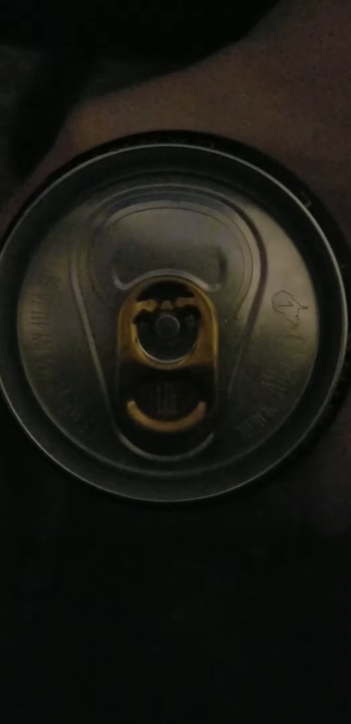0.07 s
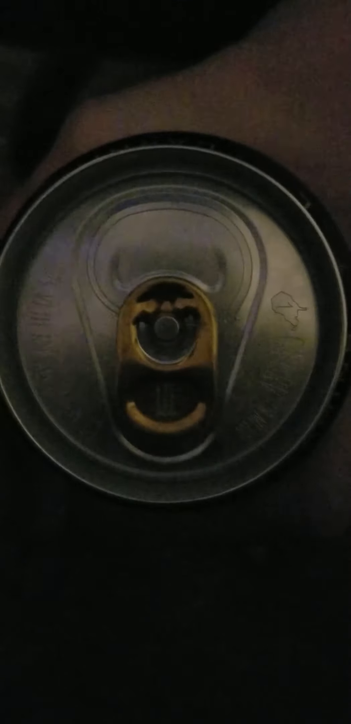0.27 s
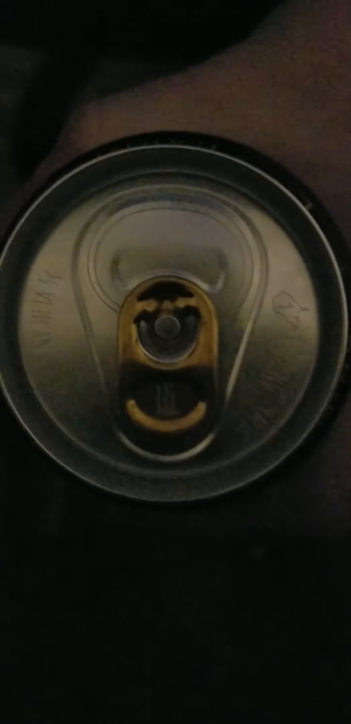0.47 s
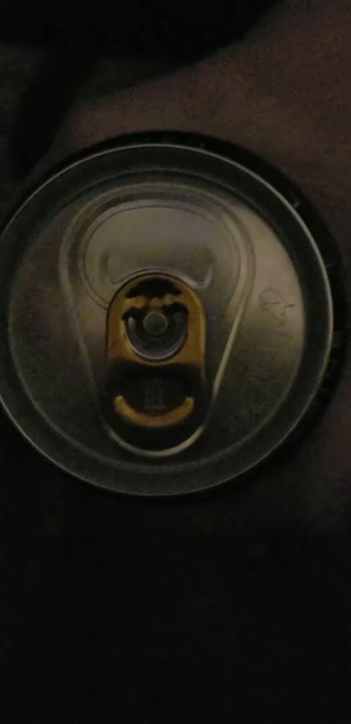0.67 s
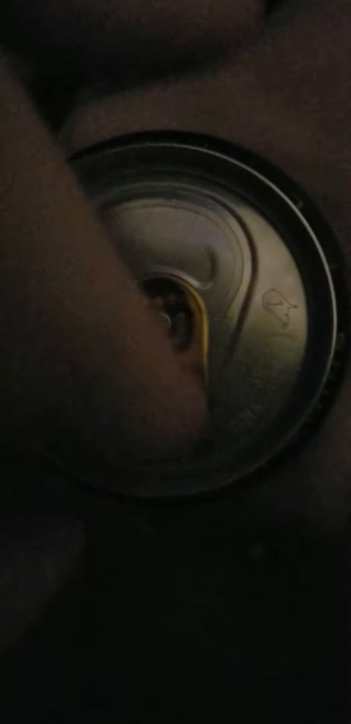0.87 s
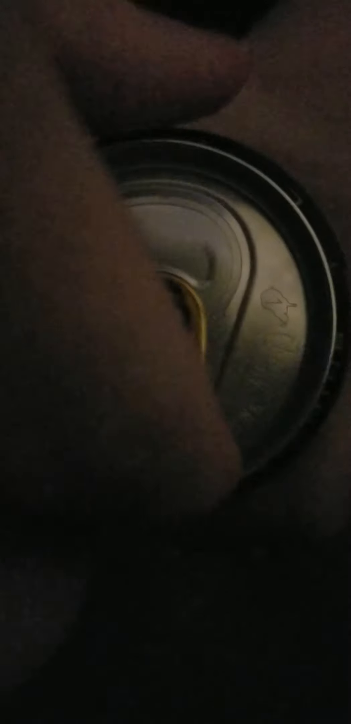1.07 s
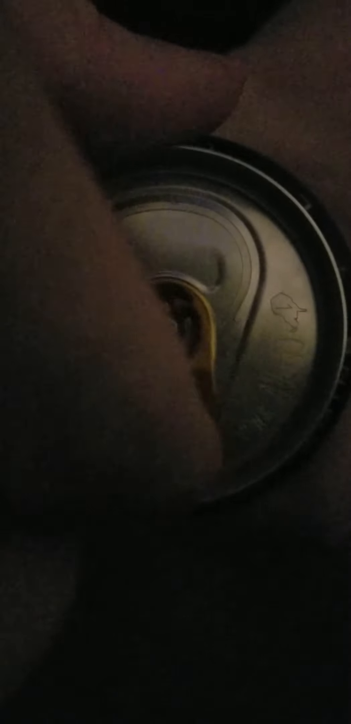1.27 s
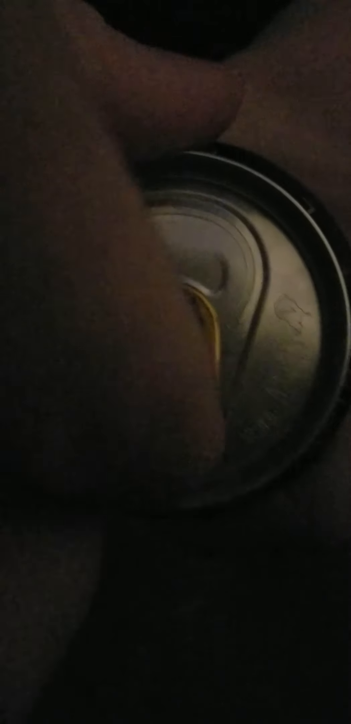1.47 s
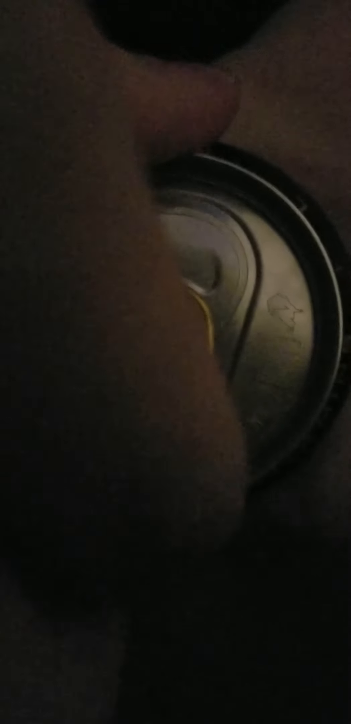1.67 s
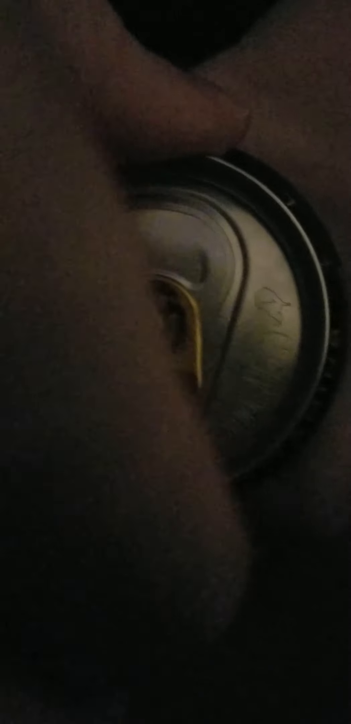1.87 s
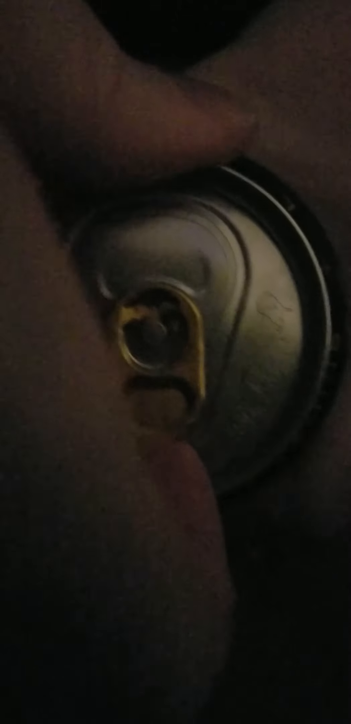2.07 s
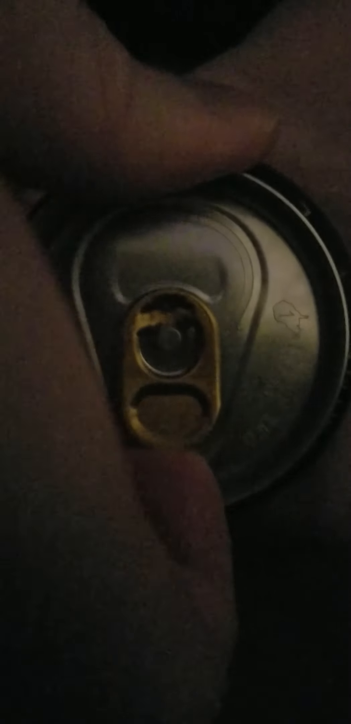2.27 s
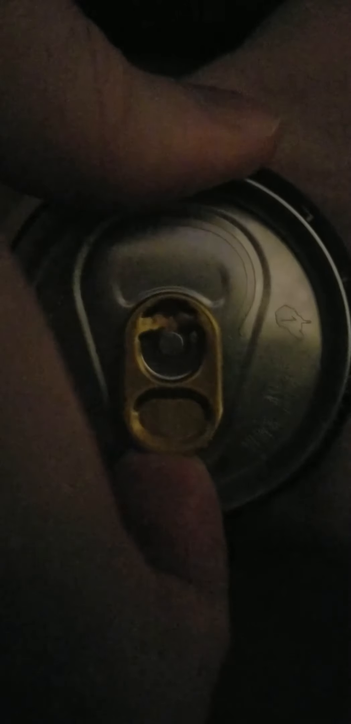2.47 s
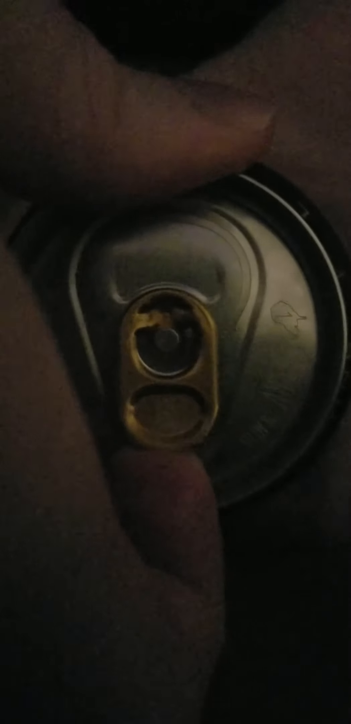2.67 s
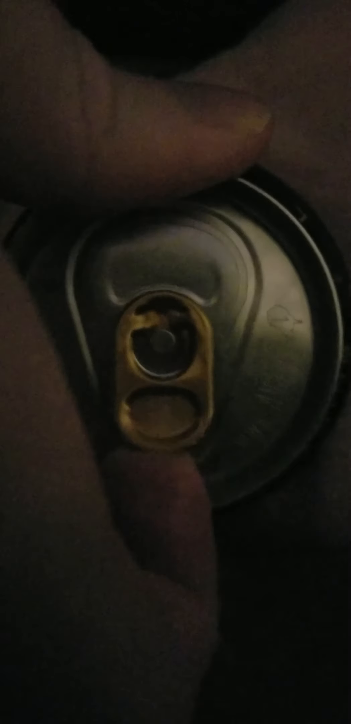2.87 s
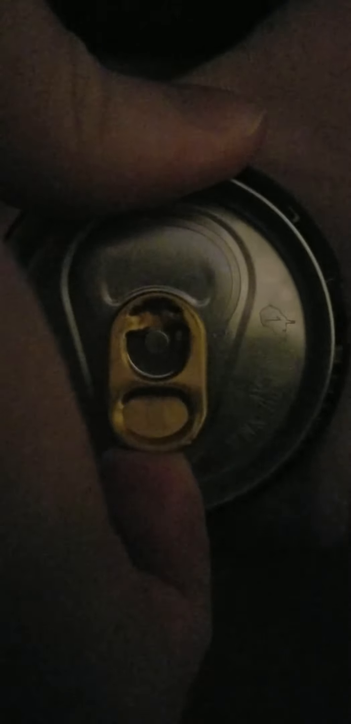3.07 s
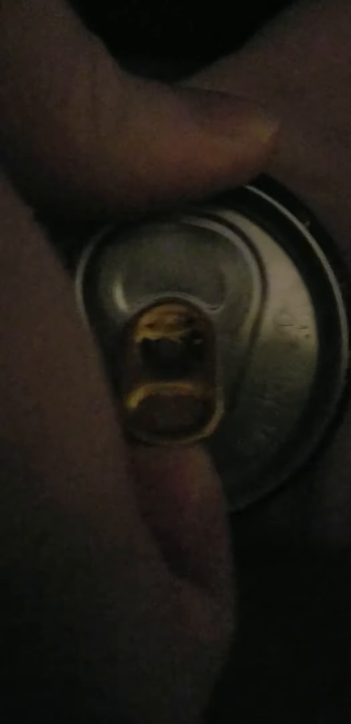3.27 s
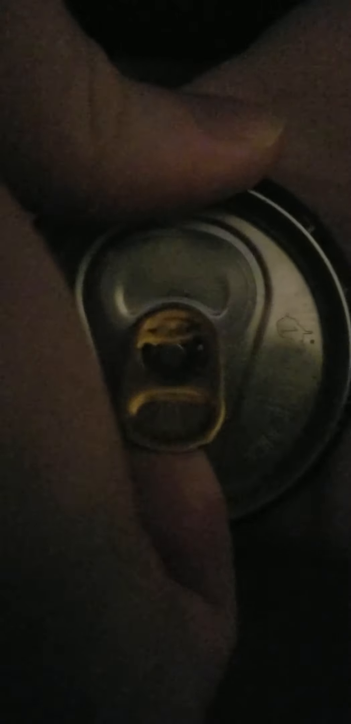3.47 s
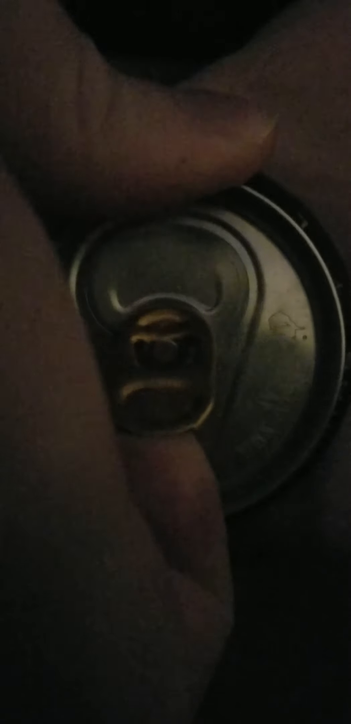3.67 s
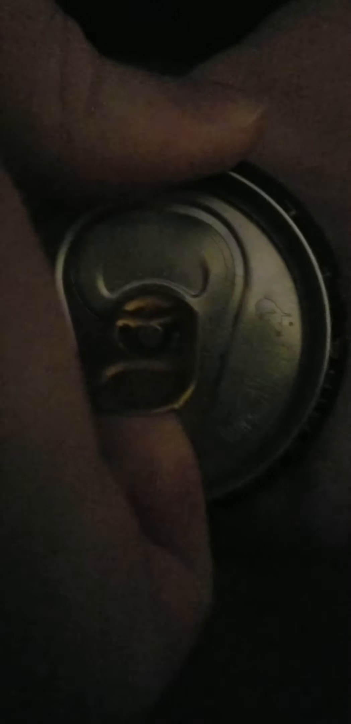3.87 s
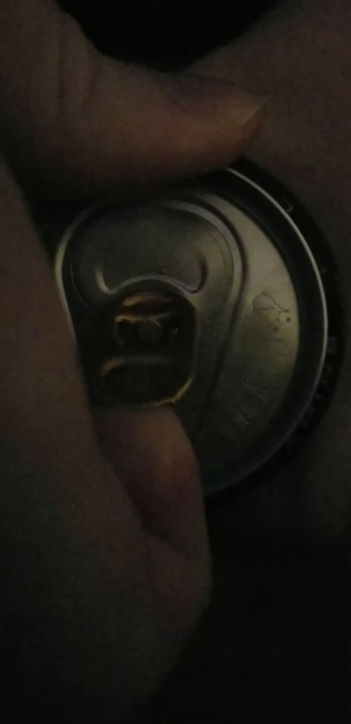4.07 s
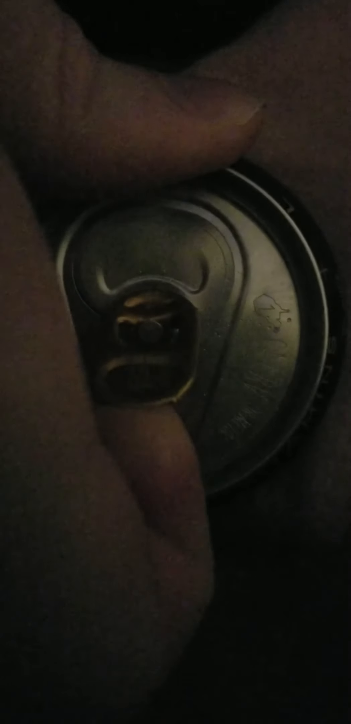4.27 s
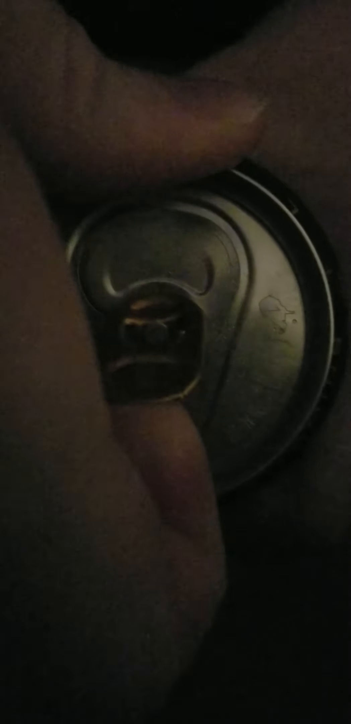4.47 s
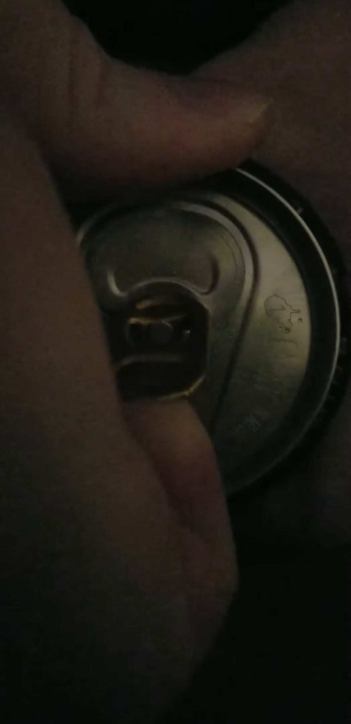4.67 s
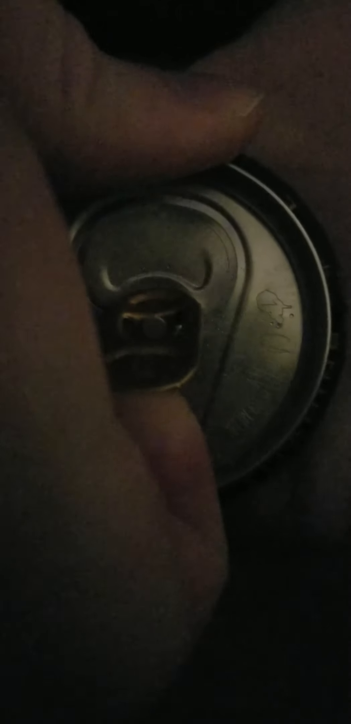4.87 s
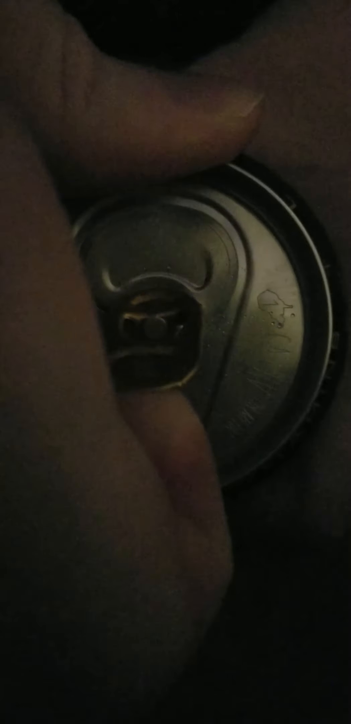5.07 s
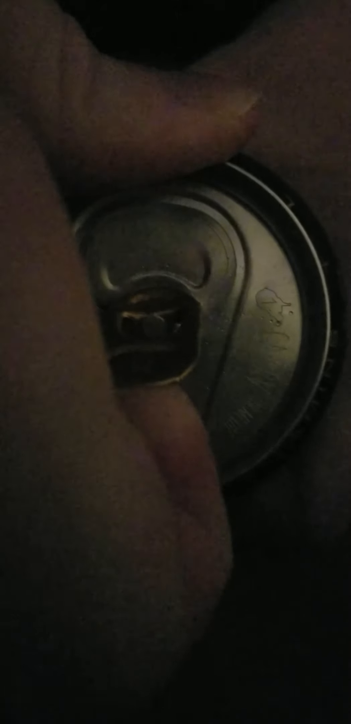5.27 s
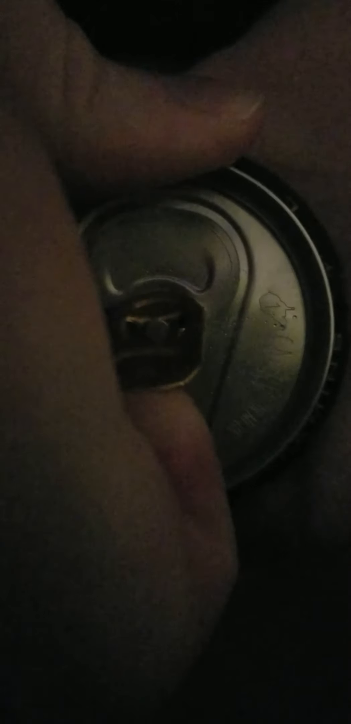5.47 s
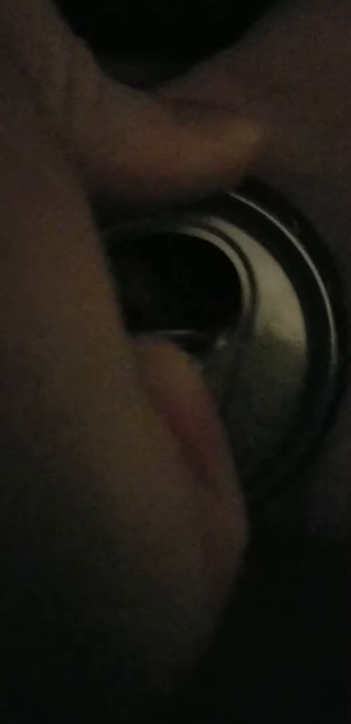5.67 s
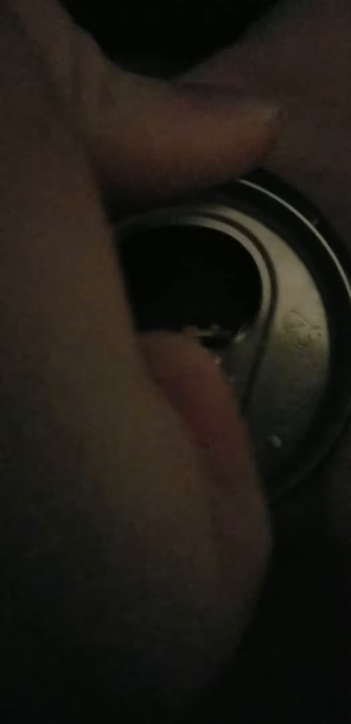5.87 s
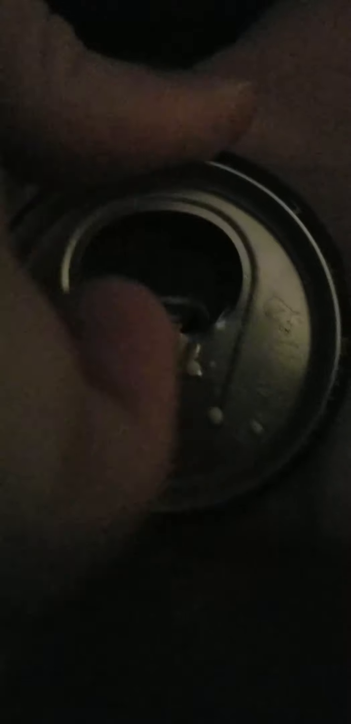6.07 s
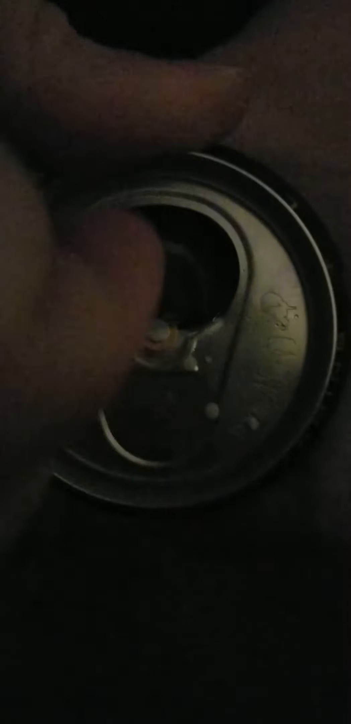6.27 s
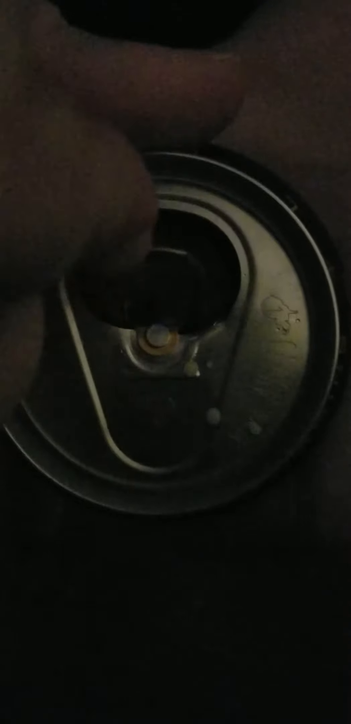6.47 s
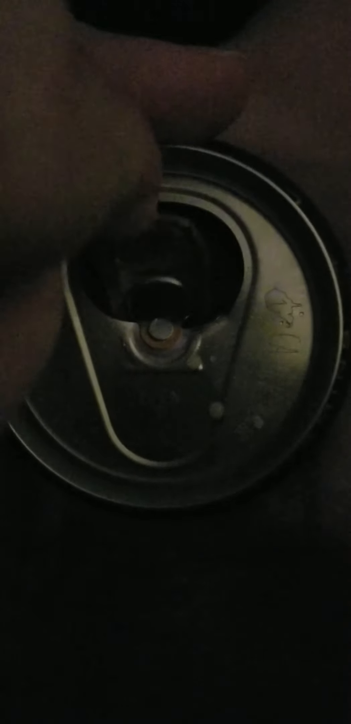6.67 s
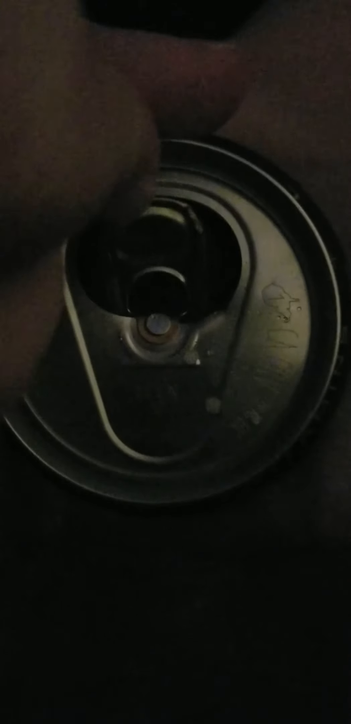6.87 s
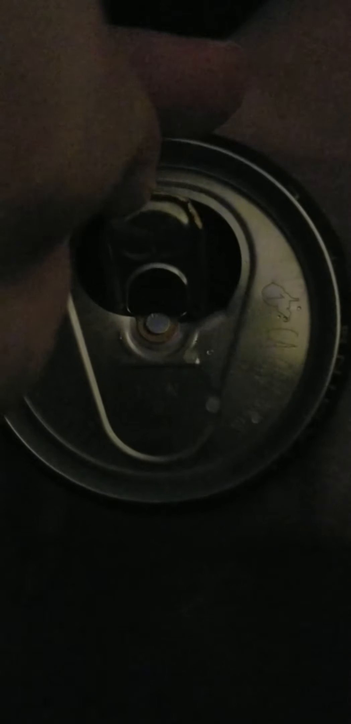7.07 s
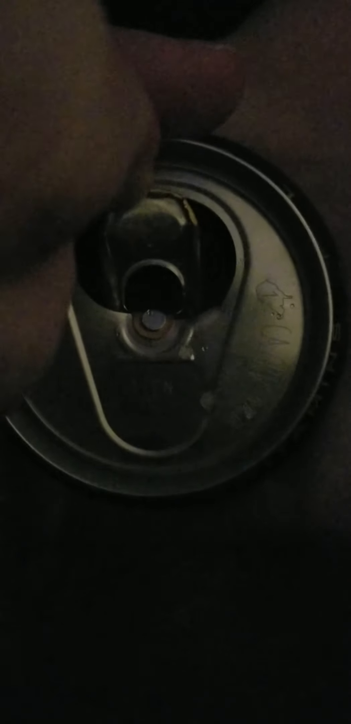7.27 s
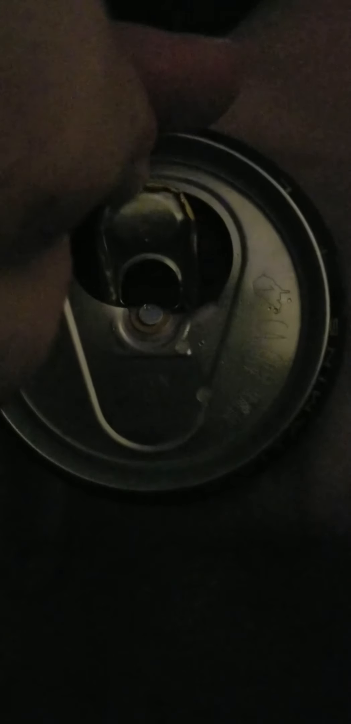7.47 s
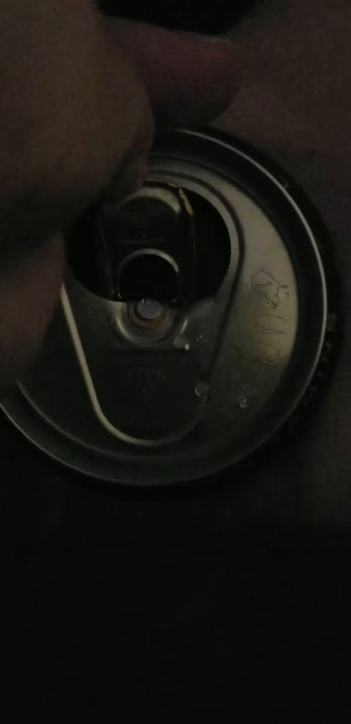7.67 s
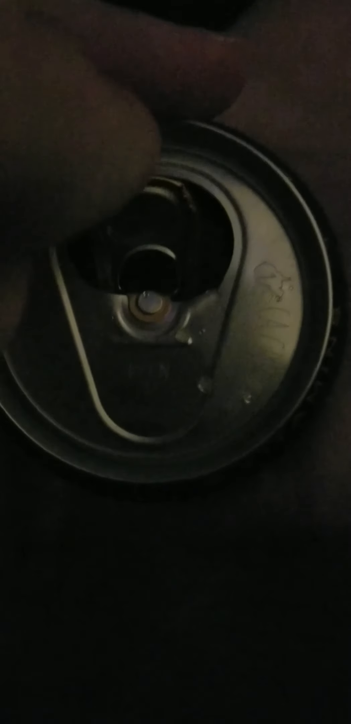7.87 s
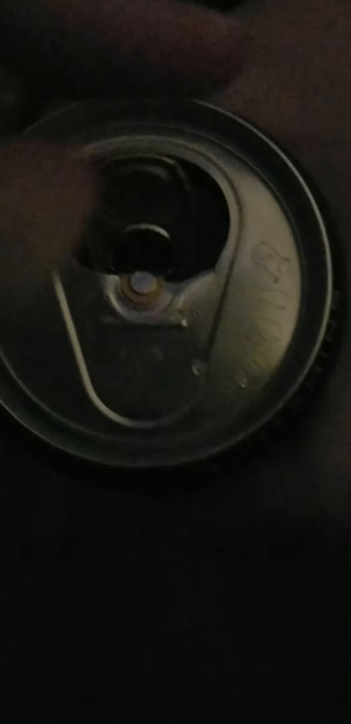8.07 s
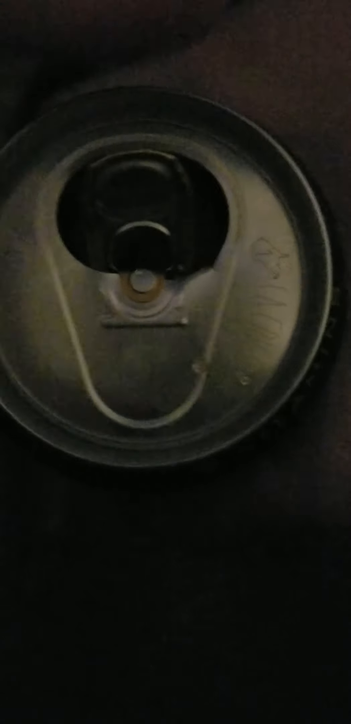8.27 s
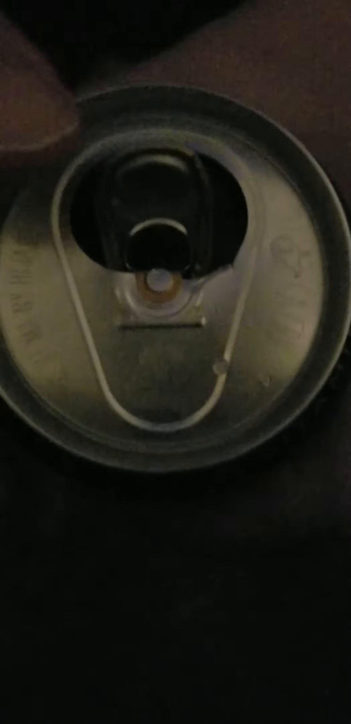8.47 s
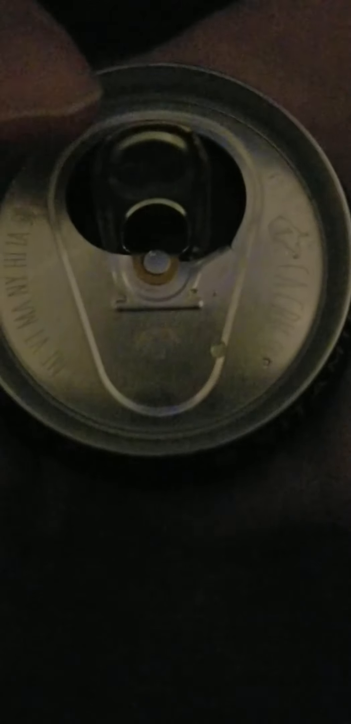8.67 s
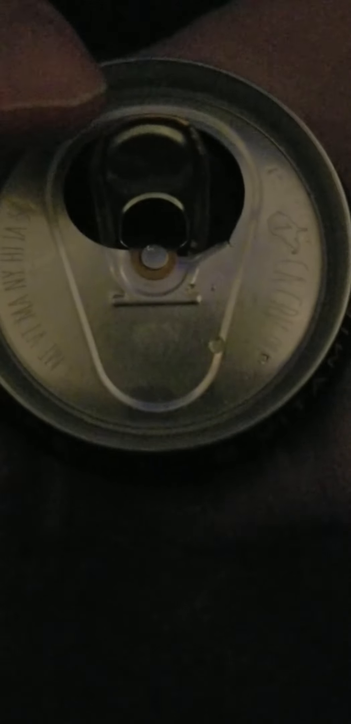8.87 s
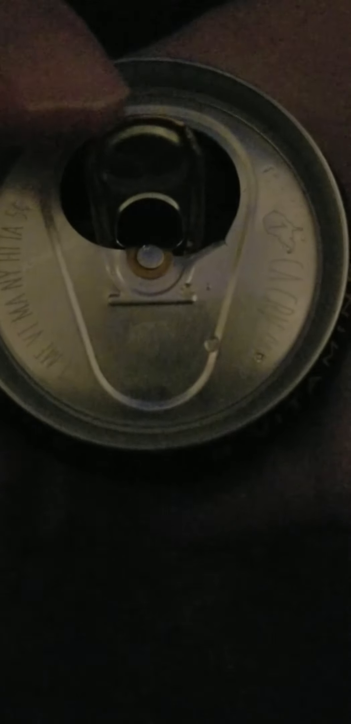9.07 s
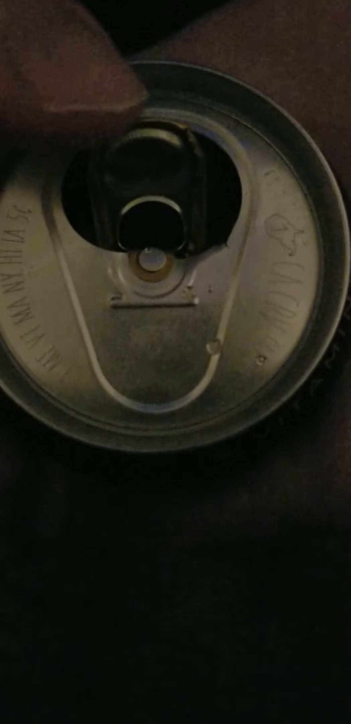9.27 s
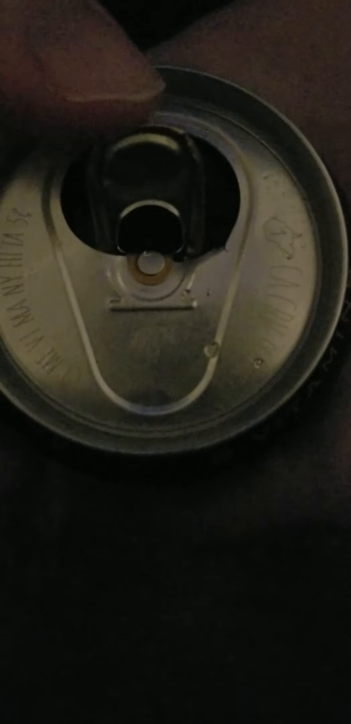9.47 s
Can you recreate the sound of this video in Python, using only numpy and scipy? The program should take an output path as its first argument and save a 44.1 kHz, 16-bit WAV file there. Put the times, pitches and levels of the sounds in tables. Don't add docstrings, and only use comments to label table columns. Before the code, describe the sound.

Low room hum, then an aluminium can's seal breaks with a loud dry crack and a very short hiss. The tab snaps back and rattles to rest; a fingernail ticks and scrapes. Later the lid buckles and tears in a rapid cluster of metallic cracks, leaving delicate fizz and tiny ticks. Close stereo pickup, strongly left, with a short room tail.

```python
import sys
import numpy as np
from scipy import signal
from scipy.io import wavfile
from scipy.ndimage import uniform_filter1d

SR = 44100
rng = np.random.default_rng(int(sys.argv[2]) if len(sys.argv) > 2 else 0)


def generate_wav(sig):
    pcm = np.round(np.clip(np.atleast_2d(sig).T, -1, 1) * 32767).astype(np.int16)
    wavfile.write(sys.argv[1], SR, pcm)


def natural_amplitude(level_db):
    exponent = np.asarray(level_db, float) / 20
    return 10 ** exponent


N = 419832

# start_s, peak_db, left_right_db, pitch_hz (best excited)
VENT_CLICKS = [
    (3.2231, -3.5, 20, 5200),
]
RESEAT_CLICKS = [
    (3.2603, -4.5, 19, 2620),
    (3.2604, -5, 17, 1960),
]
TAB_SNAPS = [
    (3.5652, -54, 2.5, 1990),
    (3.5782, -2.5, 11, 2080),
]
TAB_SLIPS = [
    (3.5827, -17.5, 17.5, 3950),
    (3.5918, -20.5, 12, 1980),
    (3.5969, -29, 7, 5210),
    (3.6005, -16.5, 12, 5330),
    (3.6082, -21, 10.5, 1940),
    (3.6177, -36, -2, 2000),
    (3.6249, -23.5, 20, 1920),
    (3.6293, -27, 21, 750),
    (3.64, -32, 21, 740),
]
NAIL_CLICKS = [
    (3.9538, -36, 18, 6850),
    (3.9645, -38.5, 15, 6850),
    (3.9687, -43, 11, 2000),
    (4.141, -27, 15, 850),
    (4.3275, -30.5, 16.5, 2080),
]
SCRAPES = [
    (4.4277, -20, 20, 7750),
    (4.4412, -22, 14, 810),
]
PRESSES = [
    (5.5712, -31, 28, 7550),
    (5.5877, -19, 14, 900),
    (5.615, -31, 13, 7550),
    (5.6734, -10, 23, 7550),
]
TEAR_CLICKS = [
    (5.6909, -4, 12.5, 3090),
    (5.6944, -12.5, 9, 2560),
    (5.6987, -12, 3, 1280),
    (5.7012, -12.5, -2, 3440),
    (5.7052, -21.5, 6, 2240),
    (5.7098, -13, 0, 3750),
    (5.7152, -13.5, 13.5, 900),
    (5.7197, -18.5, 8, 3090),
    (5.7257, -20, 0.5, 2560),
    (5.733, -31, 1.5, 3440),
]
TOUCHES = [
    (8.0069, -34, 21, 4200),
]
# start_s, peak_db
SHELL_TICKS = [(1.366, -43), (2.0108, -48), (2.117, -47), (4.9044, -55), (6.1724, -55.5), (8.0855, -55),
               (8.1093, -44), (8.271, -56), (8.346, -54), (8.477, -49), (8.6338, -42), (8.7004, -48),
               (8.8004, -48), (9.2309, -37), (9.3604, -41)]

# pitch_hz, level_db, t60_s
SEALED_MODES = [(710, -7.5, 0.041), (1246, -4, 0.022), (1610, 1.5, 0.022), (2080, 0, 0.017),
                (2770, -3, 0.0196), (3950, -2, 0.022), (5330, 0.5, 0.016), (6850, -7, 0.02),
                (7720, -5, 0.022)]
VENTED_MODES = [(1180, -22, .008), (1960, -9, 0.008), (3102, -6, 0.006), (2620, -19, .035),
                (4024, -0.5, 0.0071), (5233, -9, 0.007), (6480, -3, 0.006)]
LIFTED_MODES = [(810, -1.5, 0.024), (1280, 0, 0.013), (2240, -8, 0.019), (3200, -8, 0.025),
                (3950, -1, 0.019), (7750, -1, 0.018)]
STRAINED_MODES = [(900, -7.5, 0.026), (1460, -8, .012), (2071, 0.5, 0.013), (2602, 2, 0.018),
                  (3190, -21, 0.022), (4700, -13, 0.0499), (6250, -11, 0.021), (7550, 0.5, 0.019)]
TORN_MODES = [(920, -9, .03), (1280, -10, .02), (1850, -10, .016), (2240, -8, .016), (2560, -4, .014),
              (2850, 0, .014), (3090, 0, .014), (3440, -1, .016), (3750, -3, .016), (5300, -6, .012),
              (6250, -10, .012), (7600, -10, .015)]
OPENED_MODES = [(964, 4.5, 0.038), (1560, -24, .02), (2600, 8.5, .007), (4200, 1.5, 0.05),
                (7450, 5.5, 0.029)]
# freq_hz, density_db
CRACK_SPECTRUM = [(300, -37.5), (700, -10.5), (2000, 1.5), (4000, -7), (7000, -5), (8900, -16), (11500, -9),
                  (15500, -6), (17000, -31)]

# time_s, level_db
SPURT_LEVEL = [
    (3.2225, -59),
    (3.2245, -21),
    (3.235, -15),
    (3.246, -20),
    (3.258, -15.5),
    (3.266, -37),
    (3.285, -49),
]
# freq_hz, density_db
JET_SPECTRUM = [(240, -58), (400, -28), (1580, -16.5), (2930, -12), (3160, -17), (3810, -10.5), (4440, -8),
                (5520, -8.5), (8240, -16.5), (10900, -5.5), (16000, -1.5)]
# start_s, near_db, far_db, near_fade_db_per_s, far_fade_db_per_s
SCORE_TEAR = (5.69, -24, -24, 380, 600)
TAB_BUZZ = (3.58, -41, -52, 300, 300)
VENT_SHUDDER = (3.258, -34.5, -40, 430, 600)
# start_s, level_db, pitch_hz, decay_s
AIR_PUSHES = [
    (3.223, -22, 65.07, .02),
    (5.694, -33.5, 74, .02),
]
# freq_hz, density_db
FIZZ_SPECTRUM = [(1760, -61), (3200, -14), (4110, -5), (4940, -14.5), (7110, -3.5), (8600, -14),
                 (10500, -13), (15100, -8.5), (16000, -15), (16500, -34.5)]

# freq_hz, gain_db
SHADOW_GAIN = [(60, -10), (750, -6), (1500, -5.5), (3000, 1.5), (4500, 4.5), (5700, -2), (6800, -11),
               (9500, -16), (15000, -22)]
# delay_s, level_db
EARLY_ECHOES = [(.0005, -5.5), (.0022, -6.5), (.0031, 2), (.0045, -9.5), (.006, -10.5), (0.0101, -1.5),
                (.012, -8.5), (0.0176, -7.5), (.023, -10)]
# freq_hz, t60_s
ROOM_T60 = [(300, 0.067), (800, .24), (2000, .24), (3400, 0.22), (5500, 0.22), (9000, 0.26), (14600, 0.14)]
# freq_hz, density_db
HUM_SPECTRUM = [(12, -35), (20, -8), (58, 0), (124, -4.5), (179, -19.5), (224, -13.5), (382, -14.5),
                (440, -14.5), (599, -18), (913, -16.5), (1690, -15.5), (7300, -43.5), (8410, -62.5),
                (11500, -50), (15200, -44.5), (16500, -60)]
# centre_hz, width_hz, gain_db
HUM_BANDS = [(50, 12, 6), (78, 25, 0.5), (119.4, 8.84, 10.5), (237, 6.7, 5.5), (450, 40, 6), (900, 78, 6),
             (1690, 59.7, -0.5), (3960, 100, 5), (7430, 400, 7)]
# freq_hz, left_right_db
HUM_BALANCE = [(60, 2), (110, 1), (200, 4.5), (380, -0.5), (700, -0.5), (1290, 3.5), (2200, 1.5),
               (2900, -7), (4400, -11.5), (8120, 11), (15000, 4.5)]
# freq_hz, coherence
HUM_COHERENCE = [(50, 1), (130, 0.35), (300, .7), (700, 0.28), (1500, .3), (3000, .1)]
# time_s, room_level_db
GAIN_DUCKS = [
    (3.33, -65),
    (5.83, -69),
]

HELD, FREE = 0.35, 1.0
STRIKE_DB = 12
DULLING_DB_PER_DB = 0.24
RIP_RISE_S, RIP_HOLD_S, RIP_LENGTH_S = 0.004, 0.0097, 0.08
FIZZ_S, FIZZ_RISE_S, FIZZ_SETTLE_S = 5.8, 0.51, 1
FIZZ_DB, FROTH_DB = -17.5, 14.5
REST_DB, SETTLE_DB, SETTLE_S = -50.5, -2.5, 2.5
DUCK_DB_PER_S, CREEP_DB_PER_S, HOLD_S, RECOVER_S = 90.5, 1.54, 2.05, 1.1
AIM_DB = 6


def evened(x):
    return x / np.sqrt(np.mean(x ** 2) + 1e-20)


def peaked(x):
    return x / abs(x).max()


def read(points, hz):
    f, value = np.transpose(points)
    return np.interp(np.log(hz + 1), np.log(f + 1), value)


def add(mix, start_s, sound):
    part = mix[..., round(start_s * SR):][..., :sound.shape[-1]]
    part += sound[..., :part.shape[-1]]


def colour(x, points):
    level_db = np.maximum(read(points, abs(np.fft.fftfreq(4096, 1 / SR))), -100)
    log_gain = np.log(natural_amplitude(level_db))
    taps = np.fft.ifft(np.exp(np.conj(signal.hilbert(log_gain)))).real[:2048]
    return signal.oaconvolve(x, taps)[:len(x)]


def band(x, lo_hz, hi_hz):
    return signal.sosfilt(signal.butter(2, [lo_hz, hi_hz], "band", fs=SR, output="sos"), x)


def clicks(rows, modes, crack_s, focus_db, damping, bright_db, ring_db):
    out, t = np.zeros((2, N)), np.arange(4096) / SR
    hz, db, t60_s = np.transpose(modes)[:, :, None]
    count = len(modes)
    weakest_db = min(row[1] for row in rows)
    grits = rng.standard_normal((len(rows), 2, 4096))
    for (start_s, peak_db, pan_db, spot_hz), grit in zip(rows, grits):
        force = grit * natural_amplitude(-60 * t / [[crack_s], [crack_s + 0.008]])
        force *= np.minimum(t / (0.022 * crack_s), 1)
        force += natural_amplitude(STRIKE_DB) * (t == 0)

        picked = np.exp(-(np.log(hz / spot_hz) / 0.1) ** 2)
        bent_hz = hz * (1 + 0.02 * (1 - picked) * grit[1, -count:, None])
        lasting_s = t60_s * (damping + (1 - damping) * picked)
        phase = grit[0, -count:, None]
        ring = natural_amplitude(db + focus_db * picked - 60 * t / lasting_s) * np.sin(2 * np.pi * bent_hz * t + phase)
        onset = 1 - np.exp(-t / (0.053 * crack_s))
        ring = natural_amplitude(ring_db) * peaked(ring.sum(0) * onset)

        crack = peaked(band(colour(force[0], CRACK_SPECTRUM), 400, 8400))
        sheen_db = bright_db - DULLING_DB_PER_DB * (peak_db - weakest_db)
        sheen = natural_amplitude(sheen_db) * peaked(band(colour(force[1], CRACK_SPECTRUM), 11000, 18080))
        near = peaked(crack + ring) + sheen
        far = peaked(crack + natural_amplitude(-8.5) * ring) + natural_amplitude(-6.5) * sheen
        add(out, start_s, natural_amplitude(peak_db) * np.array([near, natural_amplitude(-pan_db) * far]))
    return out


def spurt():
    time_s, level_db = np.transpose(SPURT_LEVEL)
    t, out = np.arange(time_s[0], time_s[-1], 1 / SR), np.zeros((2, N))
    hiss, wobble = rng.standard_normal((2, len(t)))
    flutter = natural_amplitude(evened(uniform_filter1d(wobble, 40)))
    jet = natural_amplitude(np.interp(t, time_s, level_db)) * flutter * evened(colour(hiss, JET_SPECTRUM))
    add(out, t[0], jet * natural_amplitude([[0], [-17]]))
    return out


def rip(modes, start_s, near_db, far_db, near_fade_db_per_s, far_fade_db_per_s):
    u, out = np.arange(0, RIP_LENGTH_S, 1 / SR), np.zeros((2, N))
    slips_per_s = 2500
    slips = rng.standard_normal((2, len(u))) * (rng.random((2, len(u))) < slips_per_s / SR)
    lid = sum(natural_amplitude(db - 60 * u / (t60_s / 2)) * np.sin(2 * np.pi * hz * u) for hz, db, t60_s in modes)
    rings = []
    for slip in slips:
        ring = evened(np.convolve(slip, lid)[:len(u)])
        rings.append(ring + natural_amplitude(-11.5) * evened(colour(slip, CRACK_SPECTRUM)))
    fading_s = np.maximum(u - RIP_RISE_S - RIP_HOLD_S, 0)
    force_db = [[near_db], [far_db]] - np.outer([near_fade_db_per_s, far_fade_db_per_s], fading_s)
    add(out, start_s, natural_amplitude(force_db) * np.minimum(u / RIP_RISE_S, 1) ** 2 * rings)
    return out


def lid_and_tab():
    ticks = [(start_s, peak_db, 10, 6800) for start_s, peak_db in SHELL_TICKS]
    can = clicks(VENT_CLICKS, VENTED_MODES, 0.0055, 5, FREE, bright_db=-13, ring_db=7)
    can += clicks(RESEAT_CLICKS, VENTED_MODES, 0.0055, 11, FREE, bright_db=-17.5, ring_db=0.5)
    can += clicks(TAB_SNAPS, SEALED_MODES, 0.006, 5, HELD, bright_db=-3, ring_db=-1.5)
    can += clicks(TAB_SLIPS, SEALED_MODES, 0.0089, 6, HELD, bright_db=-6, ring_db=-0.5)
    can += clicks(NAIL_CLICKS, SEALED_MODES, 0.0092, 7, HELD, bright_db=-10.5, ring_db=-5.5)
    can += clicks(SCRAPES, LIFTED_MODES, 0.018, 2.5, FREE, bright_db=-9, ring_db=-2.5)
    can += clicks(PRESSES, STRAINED_MODES, 0.0079, 3, FREE, bright_db=-7.5, ring_db=0.1)
    can += clicks(TEAR_CLICKS, TORN_MODES, 0.0069, 3.2, FREE, bright_db=-3.5, ring_db=1.5)
    can += clicks(TOUCHES, OPENED_MODES, 0.0064, 2, FREE, bright_db=-15, ring_db=2.5)
    can += clicks(ticks, SEALED_MODES, 0.0047, 3.4, HELD, bright_db=-5, ring_db=-11)
    can += rip(VENTED_MODES, *VENT_SHUDDER)
    can += rip(SEALED_MODES, *TAB_BUZZ)
    can += rip(TORN_MODES, *SCORE_TEAR)
    return can


def pushes():
    out, t = np.zeros((2, N)), np.arange(SR // 5) / SR
    gusts = rng.standard_normal((len(AIR_PUSHES), len(t)))
    for (start_s, level_db, hz, decay_s), gust in zip(AIR_PUSHES, gusts):
        swing = np.sin(2 * np.pi * hz * t) + natural_amplitude(-11.5) * evened(band(gust, 119.7, 450))
        envelope = np.exp(-t / decay_s) * (1 - np.exp(-t / 0.00067))
        add(out, start_s, natural_amplitude(level_db) * natural_amplitude([[0], [-14]]) * swing * envelope)
    return out


def spray():
    u, out = np.arange(0, 0.2, 1 / SR), np.zeros((2, N))
    hiss = np.array([evened(band(v, 6800, 15000)) for v in rng.standard_normal((2, len(u)))])
    level_db = np.array([[-37], [-43]]) - np.array([[300], [250]]) * u
    add(out, SCORE_TEAR[0], natural_amplitude(level_db) * np.minimum(u / RIP_RISE_S, 1) * hiss)
    return out


def fizz():
    u = np.maximum(np.arange(N) / SR - FIZZ_S, 0)
    pops_per_s = 6000
    size = natural_amplitude(1.64 * rng.exponential(1, N))
    pops = rng.standard_normal((2, N)) * size * (rng.random(N) < pops_per_s / SR)
    x = np.array([evened(colour(p, FIZZ_SPECTRUM)) for p in pops])
    level_db = FIZZ_DB + FROTH_DB * np.exp(-u / FIZZ_SETTLE_S) + [[0], [-21]]
    return x * natural_amplitude(level_db) * np.minimum(u / FIZZ_RISE_S, 1)


def room_tail():
    taps = np.zeros((2, SR // 2))
    slots = np.arange(200, SR // 2 - 20, 20)
    at = slots + rng.integers(0, 20, (2, len(slots)))
    np.put_along_axis(taps, at, rng.choice([-1., 1.], at.shape), 1)
    hz, t, z = signal.stft(taps, SR, nperseg=256)
    fall = natural_amplitude(-60 * t / read(ROOM_T60, hz)[:, None])
    tail = signal.istft(z * (fall + natural_amplitude(-23) * np.sqrt(fall)), SR, nperseg=256)[1]
    return tail / np.linalg.norm(tail[0])


def ports(near, far):
    early = np.zeros(2048)
    for delay_s, level_db in EARLY_ECHOES:
        add(early, delay_s, natural_amplitude([level_db]))
    left, right = signal.oaconvolve(far[None], room_tail(), axes=1)[:, :N]
    echoes = band(signal.oaconvolve(far, early)[:N], 300, 5500)
    right = natural_amplitude(-1) * echoes + natural_amplitude(-2) * right
    return np.array([near + natural_amplitude(-7) * left, colour(right, SHADOW_GAIN)])


def hum():
    frames, hz = N // 512 + 5, np.fft.rfftfreq(2048, 1 / SR)
    a, b, c, d, patches = rng.standard_normal((frames, 1025, 5)).T
    patches = evened(uniform_filter1d(uniform_filter1d(patches, 15, 0), 8, 1))
    same = np.clip(read(HUM_COHERENCE, hz), -1, 1)[:, None]
    left, other = a + 1j * b, c + 1j * d
    late = np.exp(-2j * np.pi * hz * 0.00035)[:, None]
    z = np.array([left, same * late * left + np.sqrt(1 - same ** 2) * other])
    level_db = read(HUM_SPECTRUM, hz)
    for centre_hz, width_hz, gain_db in HUM_BANDS:
        level_db = level_db + gain_db * np.exp(-((hz - centre_hz) / width_hz) ** 2)
    balance_db = np.outer([0.5, -0.5], read(HUM_BALANCE, hz))[:, :, None]
    z *= natural_amplitude(level_db[:, None] + 1.2 * patches + balance_db)
    x = signal.istft(z, nperseg=2048, noverlap=1536)[1][:, :N]
    return x / band(x, 150, 2500).std()


def gain():
    t = np.arange(N) / SR
    level_db = REST_DB + SETTLE_DB * np.exp(-t / SETTLE_S)
    aim_db = REST_DB + AIM_DB
    for s, low_db in GAIN_DUCKS:
        held_db = low_db + DUCK_DB_PER_S * np.maximum(s - t, 0) + CREEP_DB_PER_S * np.clip(t - s, 0, HOLD_S)
        remaining = np.exp(-np.maximum(t - s - HOLD_S, 0) / RECOVER_S)
        level_db = np.minimum(level_db, aim_db + remaining * (held_db - aim_db))
    return natural_amplitude(level_db)


def scene():
    small_lid = signal.butter(4, 640, "high", fs=SR, output="sos")
    near, far = signal.sosfilt(small_lid, lid_and_tab() + spurt())
    can = ports(near, far) + pushes() + spray()
    quiet_edge = signal.ellip(10, 0.5, 45, 15830, fs=SR, output="sos")
    return can + signal.sosfilt(quiet_edge, gain() * (fizz() + hum()))


def top_cut(x):
    return signal.sosfilt(signal.butter(12, 16960, fs=SR, output="sos"), x)


def record(dry):
    low_cut = signal.butter(4, 38, "high", fs=SR, output="sos")
    high_cut = signal.cheby2(10, 45, 16750, fs=SR, output="sos")
    return top_cut(signal.sosfilt(np.vstack([low_cut, high_cut]), dry))


dry = scene()
out = record(dry)
generate_wav(out)
```